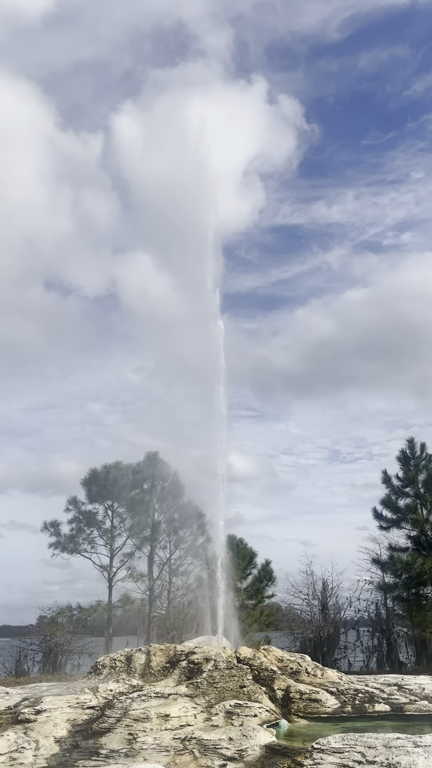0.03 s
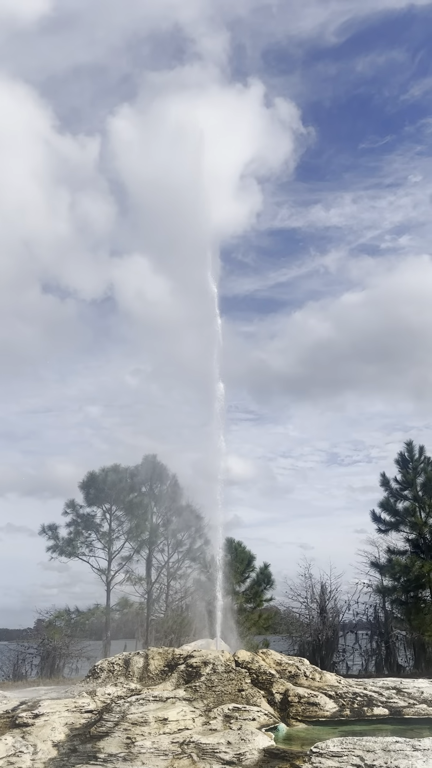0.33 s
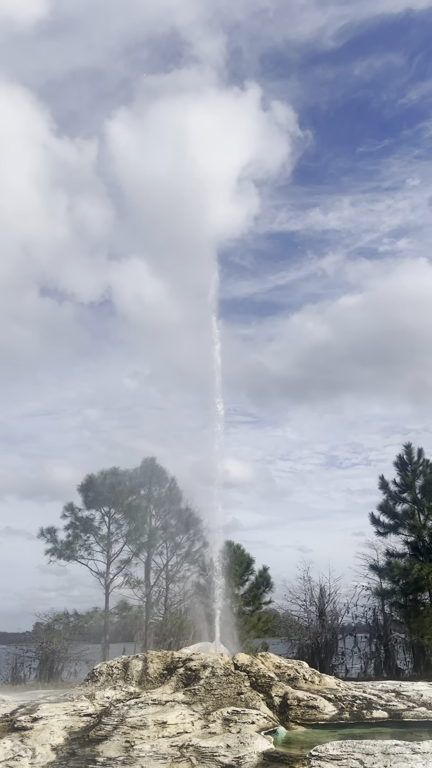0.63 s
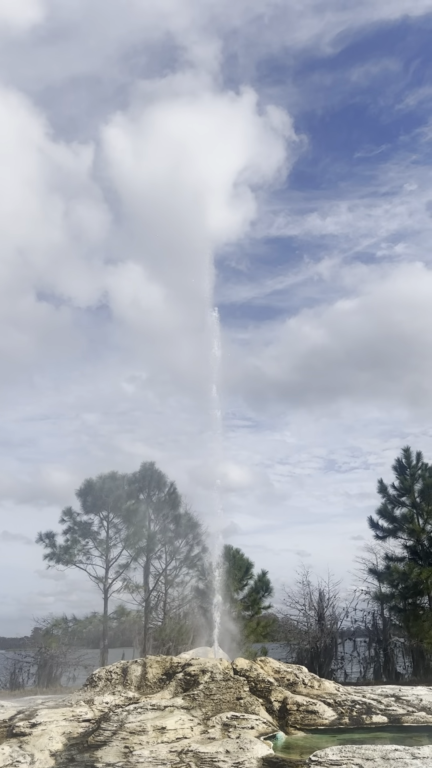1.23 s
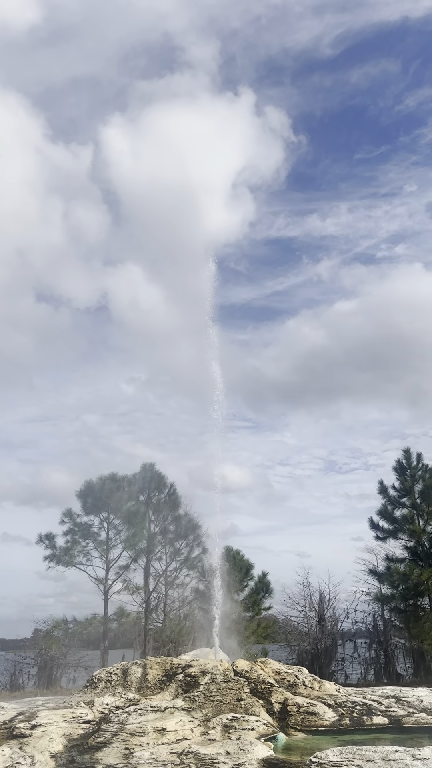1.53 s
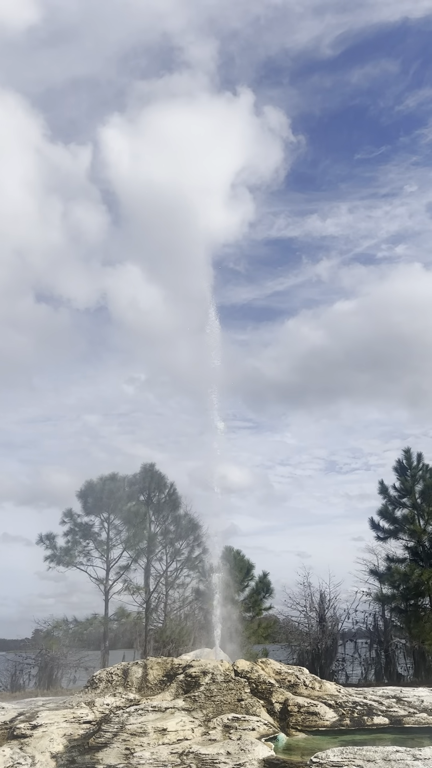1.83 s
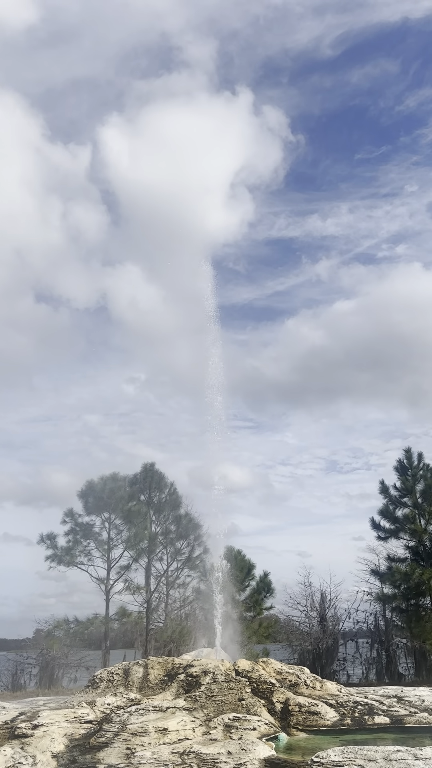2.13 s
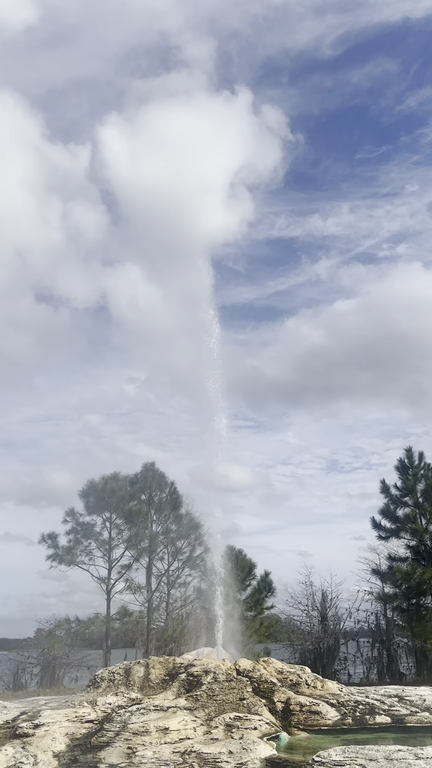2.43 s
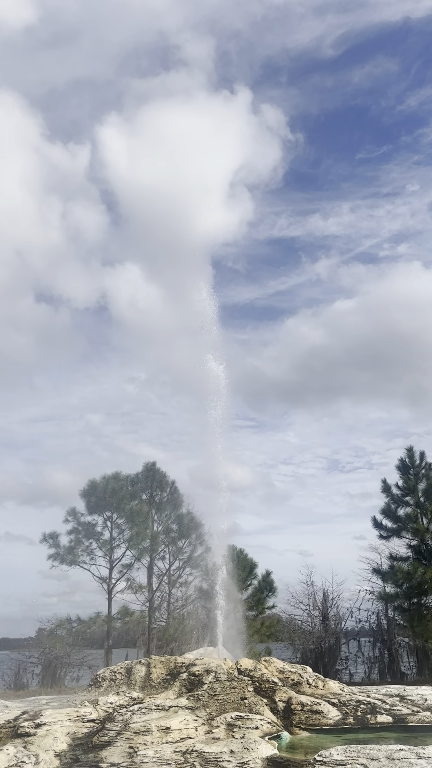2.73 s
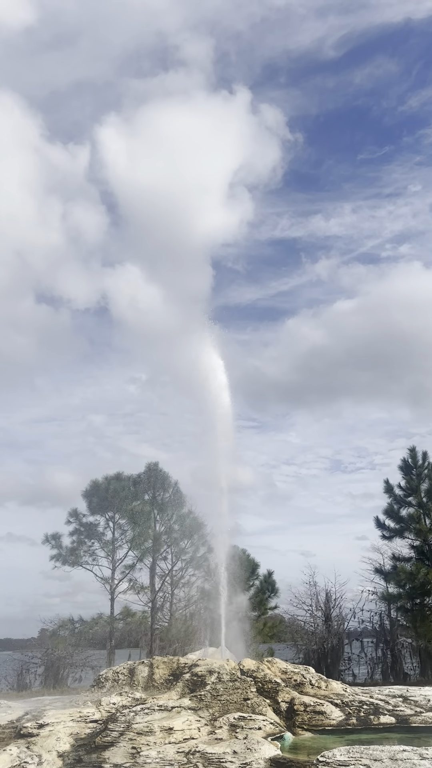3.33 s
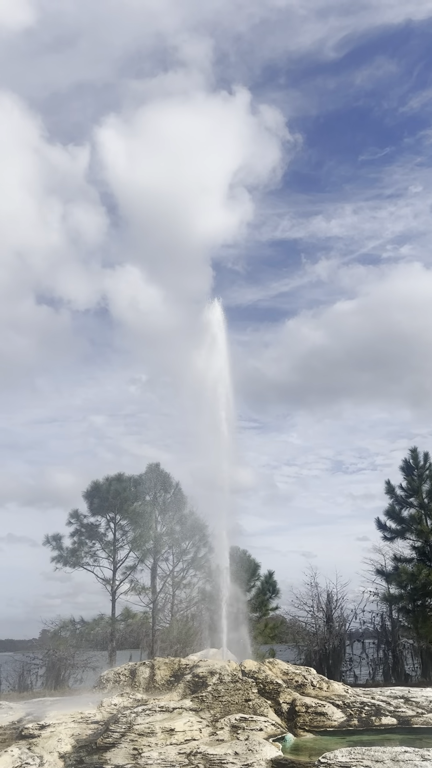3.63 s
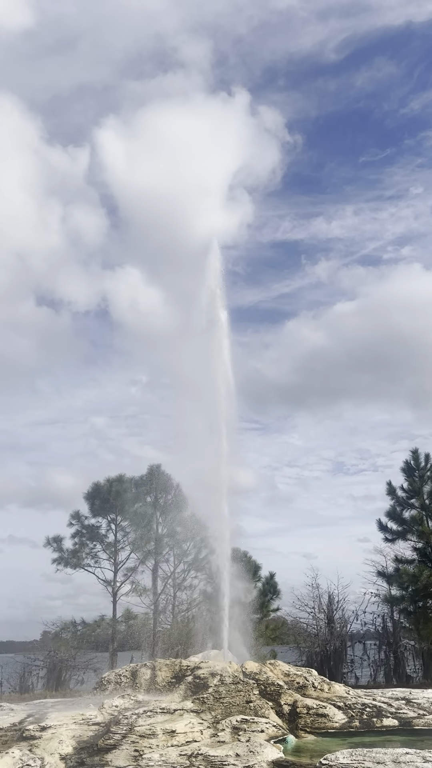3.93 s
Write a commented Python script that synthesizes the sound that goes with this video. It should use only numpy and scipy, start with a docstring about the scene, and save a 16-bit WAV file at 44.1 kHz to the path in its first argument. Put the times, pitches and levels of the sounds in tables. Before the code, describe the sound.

A geyser's water jet rushes and hisses, growing steadily stronger over a low churning rumble.

```python
"""Outdoors, at a rocky vent beside a pool, a geyser shoots a thin jet of water and grows stronger. Churning
water rumbles in the vent and slugs of gas gulp. The turbulent jet roars with the pressure, hisses, splutters
and blows a hollow note in the throat, while the cavities of the rock resonate. Spray and drops patter back onto
the rocks. The lows sit near the centre, and the channels stand in opposite phase from 11 to 13.5 kHz."""
import sys
import numpy as np
from scipy import signal
from scipy.fft import rfft, irfft
from scipy.io import wavfile

SR = 44100
rng = np.random.default_rng(int(sys.argv[2]) if len(sys.argv) > 2 else 0)


def inscribe(sig):
    """Save sig as 16-bit PCM at rate SR to the path in sys.argv[1].

    A 1-D sig is mono; a 2-D sig holds one channel per row.
    Samples are clipped to [-1, 1] before scaling.
    """
    pcm = np.round(np.clip(np.atleast_2d(sig).T, -1, 1) * 32767)
    wavfile.write(sys.argv[1], SR, pcm.astype(np.int16))


N = 176400
HZ = np.fft.rfftfreq(N, 1 / SR)
T = np.arange(N) / SR

# Churning in the vent, pressure behind the jet and hiss at the nozzle.
# Each row: time in seconds, relative level in dB.
CHURN_CURVE = [(0, -10.5), (.3, -10.7), (.55, -9.3), (.85, -8.5), (1.25, -6.8), (1.7, -4.3), (2.05, -3.5),
               (2.3, -2.6), (2.6, -2.5), (3.1, -.9), (3.4, -1), (4, -0.5)]
PRESSURE_CURVE = [(0, -12), (.5, -11), (.9, -11.5), (1.3, -8.5), (1.7, -6.5), (2, -5), (2.25, -4),
                  (2.6, -2), (2.9, -1.5), (3.2, -0.9), (3.6, -1.5), (4, 0.5)]
HISS_CURVE = [(0, -25), (.42, -9.5), (.8, -16.5), (1.4, -16.5), (1.8, -18), (2.2, -8), (2.6, -6), (3, -1.5),
              (3.3, -0.9), (3.52, 1.1), (3.75, 1), (4, -0.5)]
# Spectra of the four noise layers. Each row: frequency in Hz, relative spectral density in dB.
RUMBLE_SPECTRUM = [(20, -35), (40, -7), (60, 1), (90, -5.5), (130, -4), (170, -5), (300, -12.5), (600, -22),
                   (1500, -65)]
ROAR_SPECTRUM = [(100, -42), (300, -10.5), (700, -2.5), (1100, -1), (1700, -5), (2300, -6.5), (2800, -11),
                 (4600, -15.5), (6500, -34.5), (15000, -56)]
HISS_SPECTRUM = [(1000, -29), (2800, -4), (4600, 3), (6000, -3), (10000, -8.5), (15600, -13.5)]
SPRAY_SPECTRUM = [(80, -18), (300, -5.5), (800, 3.5), (1700, -4.5), (2200, -22), (3000, -11), (4600, 0.5),
                  (6000, -10.5), (10000, -14), (15600, -20.5)]
# Slugs of gas in the vent. Each row: time of peak in seconds, length in seconds, pitch in Hz, level in dB.
GAS_SLUGS = [(.005, 0.03, 62, -26), (0.342, .09, 62, -38), (1.096, .06, 109, -33), (1.26, .13, 114.1, -31),
             (1.59, .035, 75, -30), (1.967, 0.043, 85, -27), (2.06, 0.044, 90, -24),
             (2.182, 0.027, 126.7, -24.5), (2.245, .032, 68, -24.5), (2.314, 0.066, 123.7, -27.5),
             (2.505, 0.039, 128.4, -25), (2.512, 0.058, 66.4, -23.5), (2.659, 0.034, 78, -24),
             (2.707, .06, 92.3, -26.5), (2.817, 0.057, 91.4, -26.5), (2.897, 0.039, 85, -24),
             (2.982, 0.032, 92.7, -26.5), (3.026, .042, 87.4, -21), (3.112, 0.024, 111, -24.5),
             (3.301, .03, 82, -21.5), (3.34, .025, 72, -24), (3.508, .022, 88, -18.5),
             (3.686, .028, 365.4, -26), (3.739, .022, 80, -23), (3.823, .022, 68, -23.5),
             (3.924, .03, 118, -20)]
# Clumps of water leaving the jet. Each row: time of peak in seconds, length in seconds,
# centre frequency in Hz, spread in octaves, level in dB before the vent's resonances.
WATER_CLUMPS = [(.04, .11, 190, .7, -39.5), (1.452, 0.045, 380, .3, -38), (1.9, 0.12, 1030, 0.11, -38.5),
                (2.2, 0.076, 380, 0.8, -35.5), (2.267, .045, 370, 0.22, -38.5), (2.503, .04, 208, .6, -33),
                (2.88, 0.054, 2250, .3, -33.5), (3.03, 0.052, 1900, 0.21, -37), (3.2, 0.088, 1020, .2, -35),
                (3.37, 0.032, 296, 0.46, -36), (3.59, 0.11, 1920, 0.2, -34), (3.69, 0.075, 378, 0.77, -32),
                (3.856, .042, 365, 0.23, -36.5), (3.91, .08, 2900, 0.59, -35.5)]
# Resonances of the rocky vent. Each row: frequency in Hz, width in Hz, lift in dB.
VENT_MODES = [(90, 14.4, 7), (118.3, 36, 8), (196.1, 23.3, 8.5), (255.5, 26, 8), (366, 55, 11.5),
              (457, 23, 5), (533.6, 28.6, 7.5), (699, 15, 5.5), (811, 23, 7.5), (935.5, 35, 7),
              (1010, 53, 8.2), (1112, 135, 7.5), (1380, 100, 6), (1705, 47, 6.5), (1963, 154, 4),
              (2150, 70, 4), (2539, 146, 11.5), (2940, 66, 8), (3192, 144, 6), (3545, 65, 5.5)]
# Stereo image. Each row: frequency in Hz, left phase lead in radians, coherence from 0 to 1. From 11 to 13.5
# kHz the channels are in opposite phase.
STEREO_IMAGE = [(100, 0, .985), (400, .1, .94), (1000, -.3, .98), (1250, -1, .72), (1600, -1.6, .72),
                (1950, -.1, .95), (2450, 1.3, .88), (2850, 1.7, .72), (3500, .2, .78), (3950, -1.2, .35),
                (4500, -2.5, .78), (5250, -3.1, .95), (5600, -2.1, .41), (5850, -.8, .77),
                (7700, -1.5, .88), (8700, -2.5, .55), (9800, -2.3, .89), (11000, -3.14, 1),
                (13500, -3.14, 1), (14300, -3.7, .75), (15300, -4.3, .7)]
# Stereo balance. Each row: frequency in Hz, level of left over right in dB.
STEREO_BALANCE = [(200, -1.5), (380, 1.5), (550, 5), (800, 2.5), (1050, 9), (1500, 4), (2000, 2.5),
                  (2300, 0), (3000, 1), (6000, 0)]
# Treble response of the microphone. Each row: frequency in Hz, gain in dB.
MIC_RESPONSE = [(4800, 0), (5300, 1), (5700, -1), (6450, 2.5), (6900, -2), (7400, 3), (7900, 3), (8400, -4),
                (8950, -5), (9550, 4), (10100, 4), (10700, 0), (11250, -6), (11750, 1), (12300, 2),
                (13400, -3.5), (14000, 3), (14650, 1), (15150, 4.5), (15600, 1)]

# Base levels, before any curve or resonance acts on them.
RUMBLE_DB, ROAR_DB, HISS_DB, SPRAY_DB, DROPS_DB, THROAT_DB = -31, -26.5, -33, -37.5, -57, -30.5
BAND_LIMIT_HZ = 15750


def amp(db):
    """Converts decibels to an amplitude ratio."""
    return 10 ** (np.asarray(db) / 20)


def unit(x):
    """Scales a signal to an rms of 1."""
    return x / np.sqrt(np.mean(x ** 2) + 1e-20)


def over_hz(table, column=1):
    """Interpolates one column of a table along log frequency."""
    rows = np.array(table, float)
    return np.interp(np.log(HZ + 1), np.log(rows[:, 0] + 1), rows[:, column])


def over_time(table):
    """Interpolates a curve at every sample."""
    return np.interp(T, *np.transpose(table))


def wander(rate_hz):
    """Low-passed noise gives a smooth random fluctuation of rms 1, up to about the given rate."""
    lowpass = np.exp(-(HZ / rate_hz) ** 2) * (HZ > 1)
    return unit(irfft(rfft(rng.standard_normal(N)) * lowpass, N))


def turbulence(spectrum, patchy_db, flutter_db, rate_hz, count=9):
    """Random amplitude modulation: each band of a noise flutters alone, and all a little together."""
    white = rfft(rng.standard_normal((2, N)))
    shaped = white * amp(over_hz(spectrum)) * np.minimum(HZ / 20, 1) ** 2
    band_position = np.sqrt(np.minimum(HZ / BAND_LIMIT_HZ, 1)) * (count - 1)
    out = np.zeros((2, N))
    for k in range(count):
        band = np.maximum(1 - abs(band_position - k), 0)
        out += irfft(shaped * band, N) * amp(patchy_db * wander(rate_hz))
    return unit(out * amp(flutter_db * wander(rate_hz)))


def rumble():
    """Turbulence in the water churning in the vent radiates low-frequency noise."""
    noise = turbulence(RUMBLE_SPECTRUM, patchy_db=0.5, flutter_db=0.2, rate_hz=35)
    return noise * amp(RUMBLE_DB + over_time(CHURN_CURVE))


def roar(pressure_exponent=1.054):
    """The amplitude of turbulent jet noise grows as a power of the driving pressure."""
    noise = turbulence(ROAR_SPECTRUM, patchy_db=0.8, flutter_db=.5, rate_hz=37)
    return noise * amp(ROAR_DB + pressure_exponent * over_time(PRESSURE_CURVE))


def hiss():
    """Atomisation: the edge of the jet shreds into mist and radiates high-frequency noise."""
    noise = turbulence(HISS_SPECTRUM, patchy_db=1.1, flutter_db=0.5, rate_hz=70)
    return noise * amp(HISS_DB + over_time(HISS_CURVE))


def spray():
    """Countless impacts of fine spray on the rocks add incoherently into a steady wash."""
    return turbulence(SPRAY_SPECTRUM, patchy_db=1.2, flutter_db=0.73, rate_hz=28) * amp(SPRAY_DB)


def drops(per_second=1400, spread_db=1, low_hz=1800, high_hz=13000, decay_cycles=0.89, pitches=16):
    """Larger drops strike wet rock at random; each impact is a heavily damped oscillation, a tick."""
    out, t = np.zeros((2, N)), T[:256]
    for hz in np.geomspace(low_hz, high_hz, pitches):
        tick = unit(np.sin(2 * np.pi * hz * t) * np.exp(-t * hz / decay_cycles)) / np.sqrt(hz)
        sizes = np.minimum(rng.exponential(1, (2, N)), 5)
        lands = rng.random((2, N)) < per_second / pitches / SR
        impacts = amp(spread_db * sizes) * lands
        out += signal.oaconvolve(impacts, tick[None], axes=1)[:, :N]
    return unit(out) * amp(DROPS_DB)


def throat(hz=1035, drift_share=.035, drift_hz=9, width_hz=34):
    """The jet excites a throat resonance: narrow-band noise whose pitch wavers as the water shifts."""
    pitch = hz * (1 + drift_share * wander(drift_hz))
    phase = 2 * np.pi * np.cumsum(pitch) / SR
    note = [wander(width_hz) * np.cos(phase) + wander(width_hz) * np.sin(phase) for _ in range(2)]
    return np.array(note) * amp(THROAT_DB + over_time(PRESSURE_CURVE))


def gulps(wobble_share=0.064):
    """Each slug of gas oscillates for a few low cycles; a Gaussian envelope makes the throb soft."""
    out = np.zeros(N)
    for at, length, hz, db in GAS_SLUGS:
        near = abs(T - at) < 2 * length
        t = T[near] - at
        start_turns, wobble_turns = rng.random(2)
        pitch = hz * (1 + wobble_share * np.sin(np.pi * t / length + 2 * np.pi * wobble_turns))
        throb = np.sqrt(2) * np.sin(2 * np.pi * (start_turns + np.cumsum(pitch) / SR))
        out[near] += amp(db) * throb * np.exp(-(2 * t / length) ** 2)
    return out


def splutters():
    """Each clump of water bursting from the jet radiates a transient of band-limited noise."""
    out = np.zeros((2, N))
    for at, length, hz, octaves, db in WATER_CLUMPS:
        band = np.exp(-.5 * (np.log2((HZ + 1) / hz) / octaves) ** 2)
        swell = np.exp(-(2 * (T - at) / length) ** 2)
        noise = unit(irfft(rfft(rng.standard_normal((2, N))) * band, N))
        out += amp(db) * swell * noise
    return out


def vent(x):
    """Cavity resonance: the hollows of the rock lift the sound near their natural frequencies."""
    lift_db = sum(db / (1 + (2 * (HZ - hz) / width) ** 2) for hz, width, db in VENT_MODES)
    return irfft(rfft(x) * amp(lift_db), N)


def stereo_image(x):
    """Partial coherence: two independent signals mix into a left and right unlike in phase and level."""
    common, independent = rfft(x)
    phase_lead = over_hz(STEREO_IMAGE)
    coherence = np.clip(over_hz(STEREO_IMAGE, column=2), 0, 1)
    balance = amp(over_hz(STEREO_BALANCE))
    left = common * balance * np.exp(1j * phase_lead)
    right = coherence * common + np.sqrt(1 - coherence ** 2) * independent
    equal_power = np.sqrt(2 / (1 + balance ** 2))
    return irfft(np.array([left, right]) * equal_power, N)


def scene():
    """Superposition: the vent's noises, drops and throat note spread in stereo; the gulps are central."""
    resonant_noise = vent(rumble() + roar() + hiss() + spray() + splutters())
    return stereo_image(resonant_noise + drops() + throat()) + gulps()


def record(dry):
    """The microphone's frequency response colours the treble, and a low-pass filter limits the band."""
    coloured = irfft(rfft(dry) * amp(over_hz(MIC_RESPONSE)), N)
    lowpass = signal.firwin(511, BAND_LIMIT_HZ, window=("kaiser", 9), fs=SR)
    return signal.oaconvolve(coloured, lowpass[None], "same")


dry = scene()
out = record(dry)
inscribe(out)
```